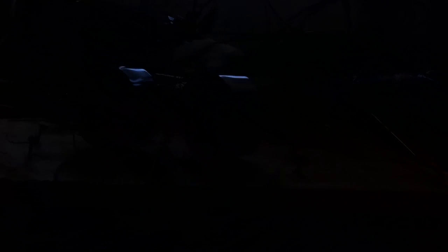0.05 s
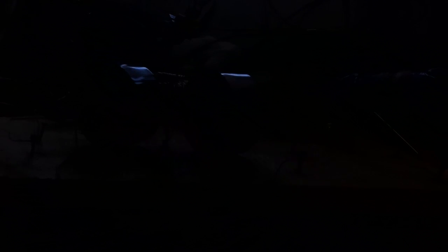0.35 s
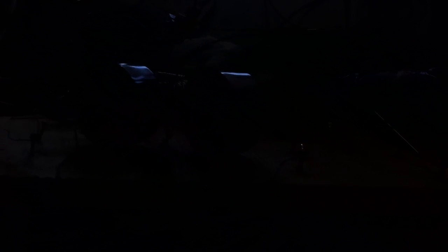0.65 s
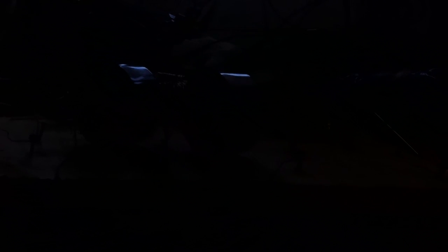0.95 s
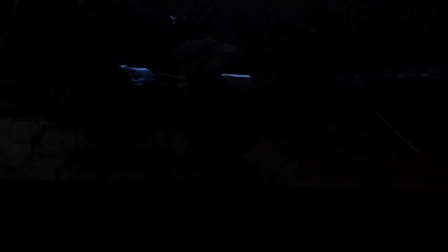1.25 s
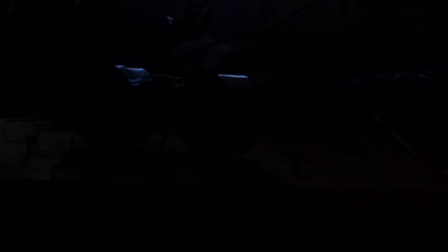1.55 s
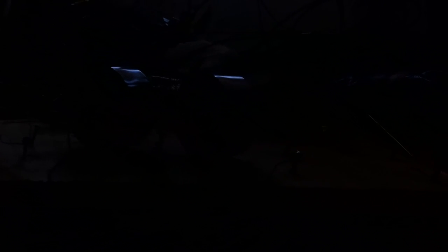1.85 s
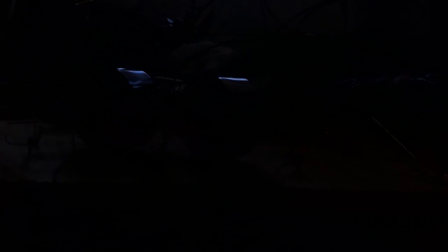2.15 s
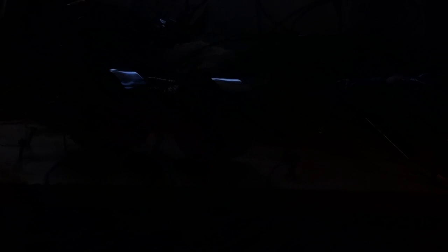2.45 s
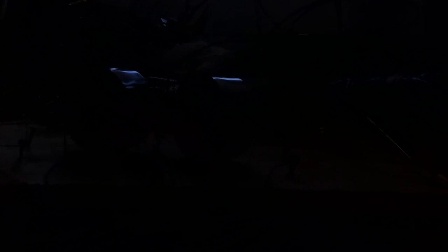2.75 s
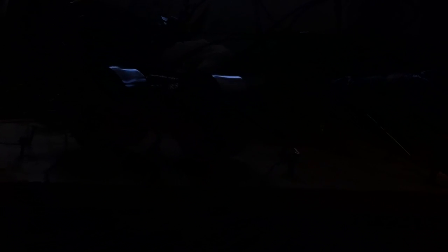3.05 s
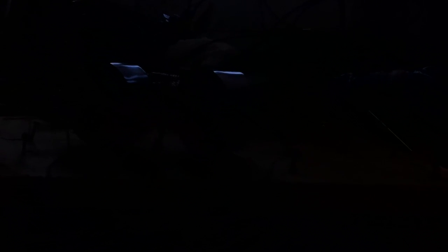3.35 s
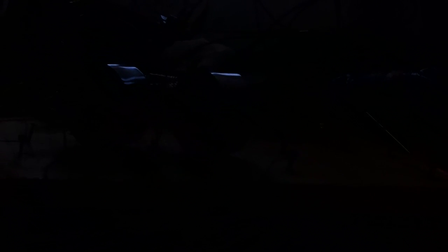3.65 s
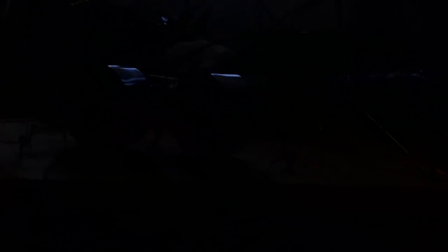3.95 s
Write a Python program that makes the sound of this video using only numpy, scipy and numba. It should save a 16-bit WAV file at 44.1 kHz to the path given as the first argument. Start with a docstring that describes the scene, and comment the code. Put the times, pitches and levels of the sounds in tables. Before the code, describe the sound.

Sharp high-voltage spark snaps, with a fast, steady train of softer clicks in between.

```python
"""High-voltage sparks on a workbench

A device fires about 15 times a second in a small, bright, humming room, mostly as weak ticks.
Now and then a full spark jumps: its crack and pressure wave overload the microphone.
The gain control ducks at each spark, then ticks and hum swell back."""
import sys
import numpy as np
from scipy import signal
from scipy.fft import rfft, irfft, next_fast_len
from scipy.io import wavfile
from scipy.ndimage import uniform_filter1d, minimum_filter1d
from numba import njit

SR = 44100
rng = np.random.default_rng(int(sys.argv[2]) if len(sys.argv) > 2 else 0)


def persist_wave(psi):
    """Save psi, clipped to +-1, as 16-bit WAV."""
    counts = np.round(np.clip(psi, -1, 1) * 32767).astype(np.int16)
    wavfile.write(sys.argv[1], SR, np.atleast_2d(counts).T)


N = 176400
TAIL_SAMPLES = 16384


def undb(db):
    """Decibels to gain."""
    return 10 ** (np.asarray(db) / 20)


def unit_energy(envelope):
    """Scale to unit energy."""
    return envelope / np.sqrt(np.sum(envelope ** 2))


def add(out, t_s, sound):
    """Mix a sound in at t_s."""
    i = int(round(t_s * SR))
    a, b = max(i, 0), min(i + len(sound), len(out))
    out[a:b] += sound[a - i:b - i]


def colour(x, response):
    """Minimum-phase filter through (f/Hz, level/dB) points."""
    hz, db = np.array(response, float).T
    size = next_fast_len(len(x) + TAIL_SAMPLES)
    size += size % 2
    bins_hz = np.maximum(np.arange(size // 2 + 1) * SR / size, 1)
    gain = undb(np.interp(np.log(bins_hz), np.log(hz), db))
    cepstrum = irfft(np.log(gain))
    cepstrum[1:size // 2] *= 2
    cepstrum[size // 2 + 1:] = 0
    return irfft(rfft(x, size) * np.exp(rfft(cepstrum)))[:len(x)]


def discharges(events, direct_eq, reverb_eq, echoes, t60_s, fresh_share, build_ms=5):
    """Impulses scattered by bench and room; fresh_share of the scatter varies with each discharge path."""
    ms = np.arange(TAIL_SAMPLES) * 1000 / SR
    early_power = np.zeros(TAIL_SAMPLES)
    for delay_ms, spread_ms, db in echoes:
        window = (ms >= delay_ms) * np.exp(-((ms - delay_ms) / spread_ms) ** 4)
        early_power += (undb(db) * unit_energy(window)) ** 2
    early = np.sqrt(early_power)
    late = unit_energy((1 - np.exp(-ms / build_ms)) * undb(-60 * ms / 1000 / t60_s))
    impulse = ms == 0
    common = rng.standard_normal(TAIL_SAMPLES)
    direct, reverb = np.zeros(N), np.zeros(N)
    for t_s, db in events:
        fresh = rng.standard_normal(TAIL_SAMPLES)
        scatter = np.sqrt(1 - fresh_share) * common + np.sqrt(fresh_share) * fresh
        add(direct, t_s, undb(db) * (impulse + early * scatter))
        add(reverb, t_s, undb(db) * late * scatter)
    return colour(direct, direct_eq) + colour(reverb, reverb_eq)


# full sparks: t/s, wave level/dB, crack level/dB, time to deepest suction/ms
SPARKS = [(-.007, 4.5, 1, 0.83), (0.0647, 1.5, 4, 0.88), (0.2016, 1, 4.5, 0.69), (0.2739, -13, -19.5, 0.42),
          (0.345, 4, 6.5, 1), (0.4131, 1, 1.5, 0.64), (0.4866, 0.5, 1.5, 0.93), (.563, 5, 6.5, 0.53),
          (2.4175, 3, 0, 0.98), (2.4943, 3, 3.5, 0.82), (3.7213, 1, -1, 0.78), (3.9811, 6, 5.5, 0.89)]
# crack spectra, direct and reverberant: f/Hz, level/dB
CRACK_DIRECT_EQ = [(100, 15), (600, 23.8), (1050, 18.7), (1700, 6.7), (2700, 24.4), (3800, 13.5),
                   (6000, 10.8), (11000, 19.5), (16000, 18.1)]
CRACK_REVERB_EQ = [(100, -1), (500, -26), (1000, 1), (2000, 10), (3200, 11), (5000, 18.5), (7000, 17),
                   (11000, 18.5), (16000, 17)]
# bench reflections of the crack: delay/ms, spread/ms, level/dB
CRACK_ECHOES = [(.25, .8, 1), (1.9, 1, -3), (5.7, .5, -20), (7.8, 1.2, -19), (13.5, .8, -19),
                (15.8, .6, -20)]
# reflections of the pressure wave: delay/ms, level/dB
WAVE_ECHOES = [(5.75, -9), (8.8, -25)]


def sparks(push_db=10, push_ms=0.11, suction_db=3):
    """A full spark cracks and pushes the air out, leaving a longer suction; nearby surfaces return both."""
    crack_events = [(t_s, crack_db) for t_s, _, crack_db, _ in SPARKS]
    cracks = discharges(crack_events, CRACK_DIRECT_EQ, CRACK_REVERB_EQ, CRACK_ECHOES,
                        t60_s=0.14, fresh_share=0.57)
    ms = np.arange(TAIL_SAMPLES) * 1000 / SR
    push = undb(push_db) * np.exp(-(ms / push_ms) ** 2)
    waves = np.zeros(N)
    for t_s, wave_db, _, suction_ms in SPARKS:
        age = ms / suction_ms
        suction = undb(suction_db) * (age * np.exp(1 - age)) ** 3.4
        for delay_ms, echo_db in [(0, 0), *WAVE_ECHOES]:
            add(waves, t_s + delay_ms / 1000, undb(wave_db + echo_db) * (push - suction))
    return cracks + waves


# room noise spectrum: f/Hz, relative level/dB
NOISE_EQ = [(20, 13), (70, 0.5), (120, -2), (220, -4.5), (340, 0.5), (550, -2), (1100, -3.5), (1500, -11),
            (3000, -14.5), (8000, -17), (16000, -45)]
# faint hum tones: f/Hz, level/dB
HUM_TONES = [(120, -66.5), (683.7, -68.5), (1066, -64), (1276, -61)]
# main hum envelope: t/s, level/dB
HUM_SWELL = [(0, -60), (1.0, -62.5), (1.25, -55), (1.65, -54), (1.8, -64), (1.92, -56), (2.1, -64),
             (2.3, -55.5), (2.7, -57.5), (3.6, -60.5)]


def room_tone(noise_db=-47, main_hum_hz=335, waver_depth=0.25, waver_rad=0.5):
    """Soft noise, a swelling hum and fainter tones, all tones wavering in level and phase."""
    t = np.arange(N) / SR
    noise = colour(rng.standard_normal(N), NOISE_EQ)
    out = undb(noise_db) * noise / noise.std()
    swell_db = np.interp(t, *np.array(HUM_SWELL).T)
    knots_s = np.linspace(0, t[-1], 25)
    for hz, db in [*HUM_TONES, (main_hum_hz, swell_db)]:
        waver = 1 + waver_depth * np.interp(t, knots_s, rng.standard_normal(len(knots_s)))
        phase_rad = waver_rad * np.interp(t, knots_s, rng.standard_normal(len(knots_s)))
        out += np.sqrt(2) * undb(db) * waver * np.sin(2 * np.pi * hz * t + phase_rad)
    return out


# weak discharges: t/s, level/dB
TICKS = [(0.1337, -1.5), (0.6282, 0), (0.6897, 0), (0.7553, 0.7), (0.8185, 0), (0.8791, -0.5),
         (0.9409, -0.5), (1.0029, -0.3), (1.0629, -1), (1.1375, 0.6), (1.1981, 0), (1.2599, 0.5),
         (1.3265, 0.5), (1.3851, -1), (1.4558, 0.1), (1.5212, 0.5), (1.5832, -0.5), (1.6475, 0),
         (1.7071, -0.2), (1.7699, 0.3), (1.8323, -0.3), (1.8998, 0.5), (1.9591, -0.7), (2.0263, -0.3),
         (2.0951, 0), (2.1561, -1), (2.2304, 1.2), (2.2928, -1.3), (2.3549, -1.3), (2.5724, -0.5),
         (2.637, -0.8), (2.6995, 0.5), (2.7733, 0), (2.8367, 1.8), (2.8963, -1.3), (2.9547, -1.5),
         (3.0192, -1), (3.0797, -1), (3.147, -0.7), (3.2207, 0), (3.2823, -0.7), (3.343, -0.8),
         (3.4058, -1.5), (3.4657, -1.7), (3.528, 0.3), (3.5966, 1), (3.659, -1.5), (3.7842, -5),
         (3.8523, -3), (3.9181, -3)]
# tick spectra, direct and reverberant: f/Hz, level/dB
TICK_DIRECT_EQ = [(100, -11.5), (500, -5.5), (1100, -3), (1500, -10), (2000, -1), (3000, -1), (4000, 1.5),
                  (4800, 8), (6400, 8), (7500, 1), (11000, 6.5), (16000, 3)]
TICK_REVERB_EQ = [(100, -12.5), (500, -11.5), (1050, -2), (1500, -6.5), (2000, -3.5), (3000, -5),
                  (4000, -1), (4800, 2), (5700, -1.5), (6400, 2), (7600, -0.5), (11000, 0), (16000, -5)]
# bench reflections of the tick: delay/ms, spread/ms, level/dB
TICK_ECHOES = [(.25, .6, -8), (1.8, 1.1, -13), (5.5, .7, -23), (7.8, 1.8, -23), (13.6, .7, -23),
               (15.8, .7, -24)]
# device and bench resonances: f/Hz, width/Hz, level/dB
RESONANCES = [(1990, 260, 0.5), (2900, 140, 1.5), (3314, 190, 2.5), (4870, 220, -4.5), (6560, 120, -0.5),
              (8400, 130, -10)]


def ticks():
    """Weak discharges, coloured by short resonances of the device and bench."""
    clicks = discharges(TICKS, TICK_DIRECT_EQ, TICK_REVERB_EQ, TICK_ECHOES, t60_s=0.11, fresh_share=0.4)
    ringing = np.zeros(N)
    for hz, width_hz, db in RESONANCES:
        b, a = signal.iirpeak(hz, hz / width_hz, fs=SR)
        ringing += undb(db) * signal.lfilter(b, a, clicks)
    return clicks + ringing


def scene():
    """Ticks, sparks and room tone, mono."""
    return (ticks() + sparks() + room_tone())[None]


@njit
def gain_control(allowed, gain, recovery_s):
    """Gain drops at once to the allowed value, then creeps back towards one."""
    out = np.empty(len(allowed))
    for i in range(len(allowed)):
        gain = min(allowed[i], gain + (1 - gain) / (recovery_s * SR))
        out[i] = gain
    return out


def record(dry, overload=3.34, ceiling_rms=0.25, low_cut_hz=130, high_cut_hz=15900):
    """Microphone overload, low cut, ducking gain control, high cut."""
    low_cut = signal.butter(2, low_cut_hz, "high", fs=SR, output="sos")
    high_cut = signal.ellip(8, 0.2, 70, high_cut_hz, fs=SR, output="sos")
    mic = signal.sosfilt(low_cut, overload * np.tanh(dry[0] / overload))
    rms = np.sqrt(np.abs(uniform_filter1d(mic ** 2, size=88)))  # 2 ms window
    allowed = minimum_filter1d(ceiling_rms / np.maximum(rms, ceiling_rms), size=89)
    ducked = mic * gain_control(allowed, gain=0.2, recovery_s=1.615)
    return signal.sosfilt(high_cut, ducked)[None]


dry = scene()
out = record(dry)
persist_wave(out)
```